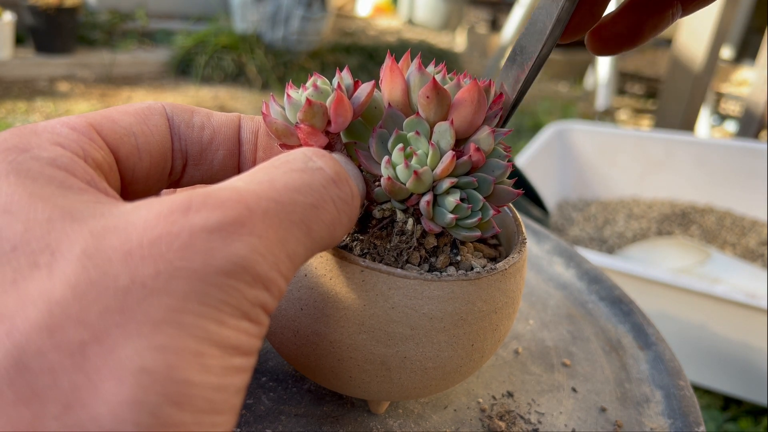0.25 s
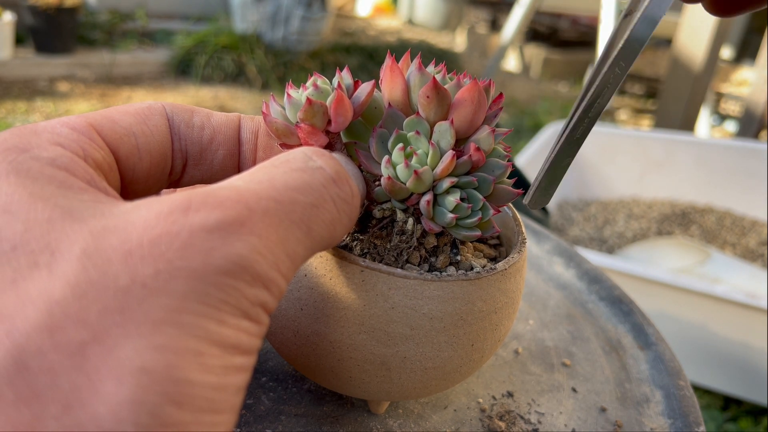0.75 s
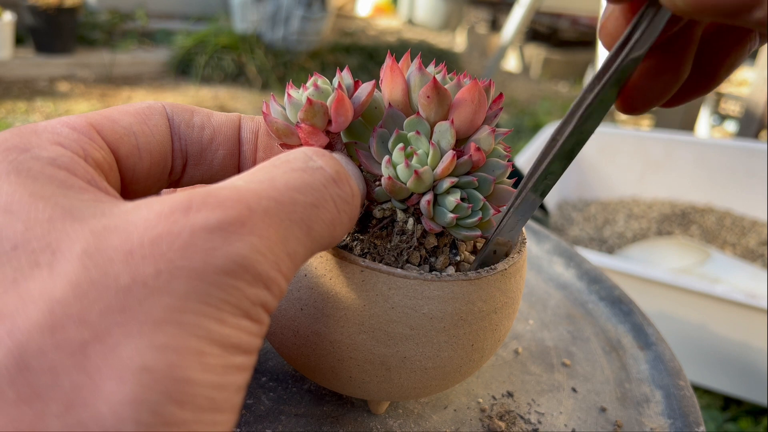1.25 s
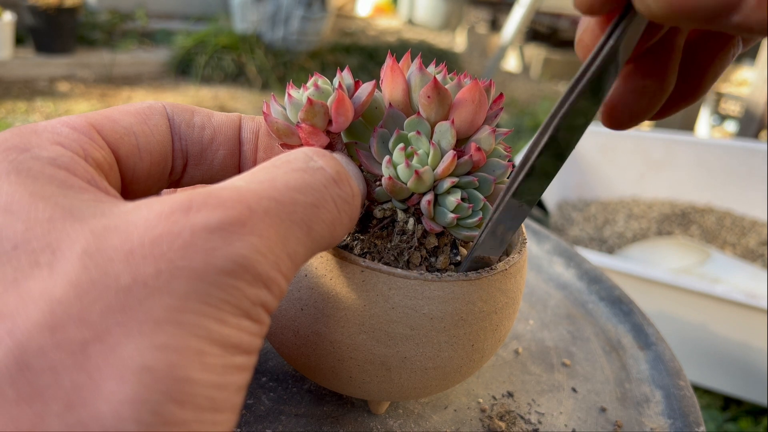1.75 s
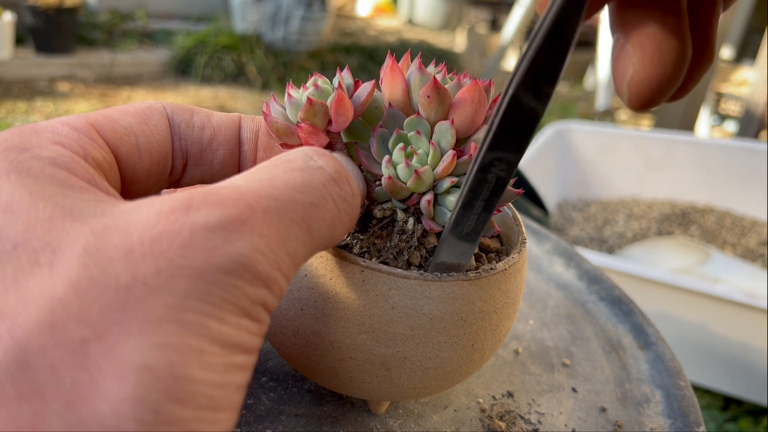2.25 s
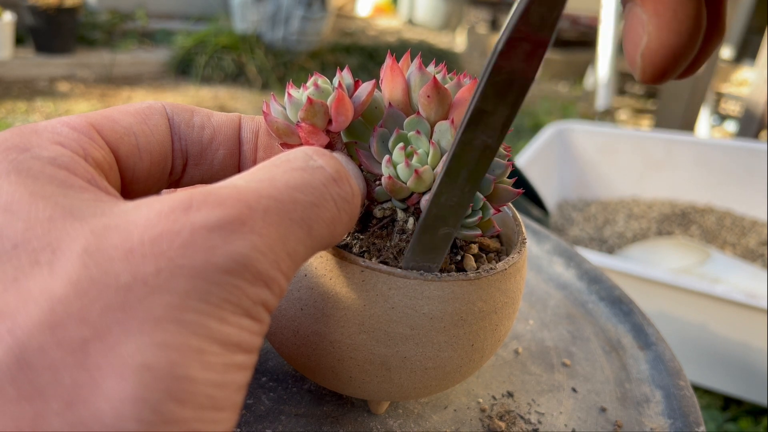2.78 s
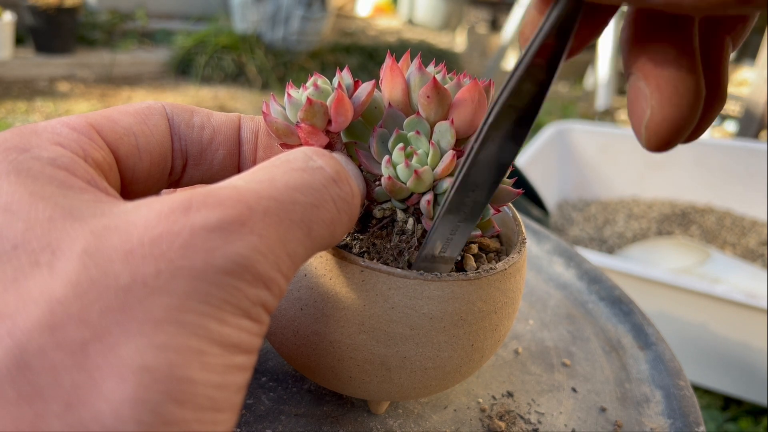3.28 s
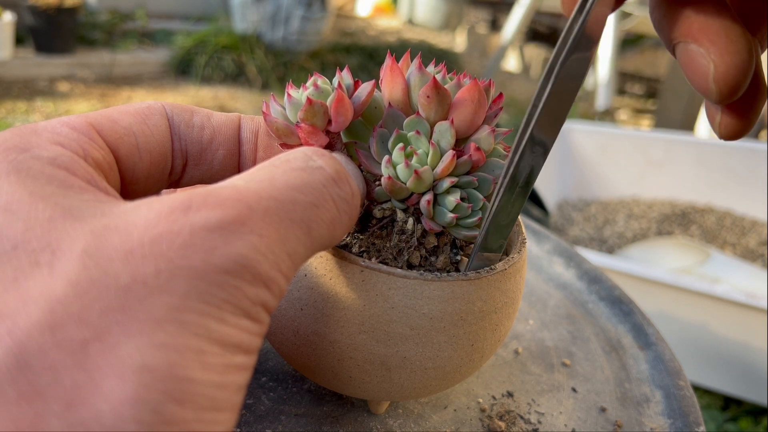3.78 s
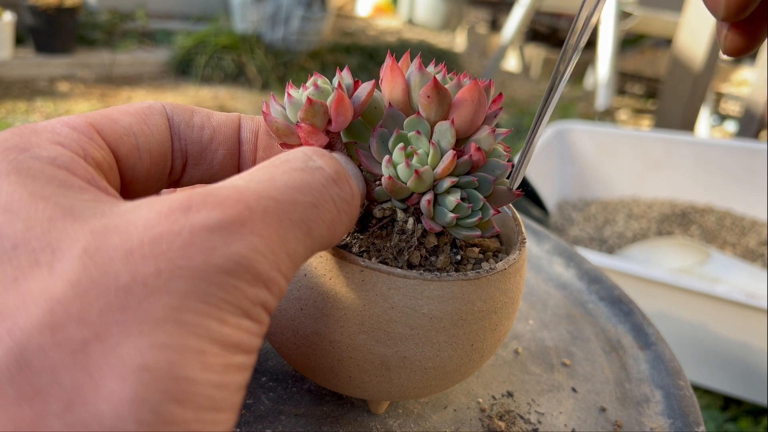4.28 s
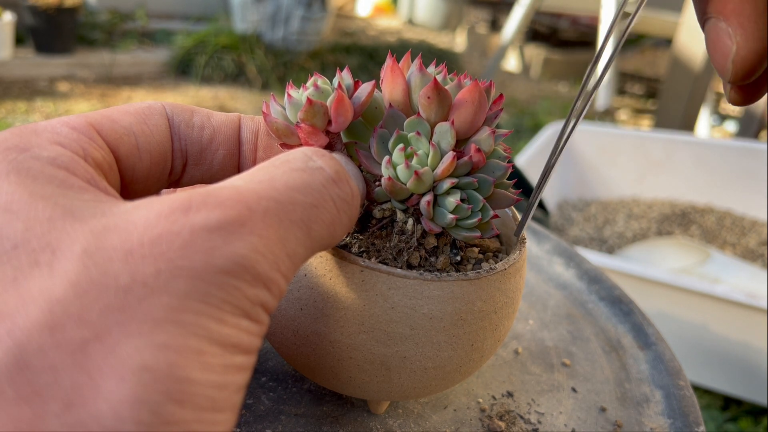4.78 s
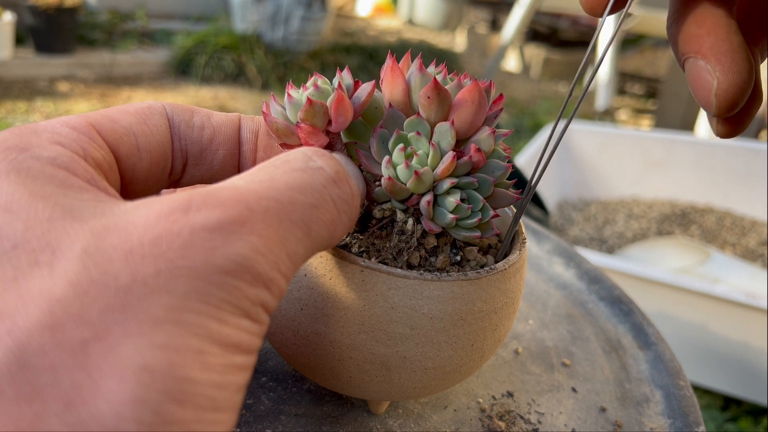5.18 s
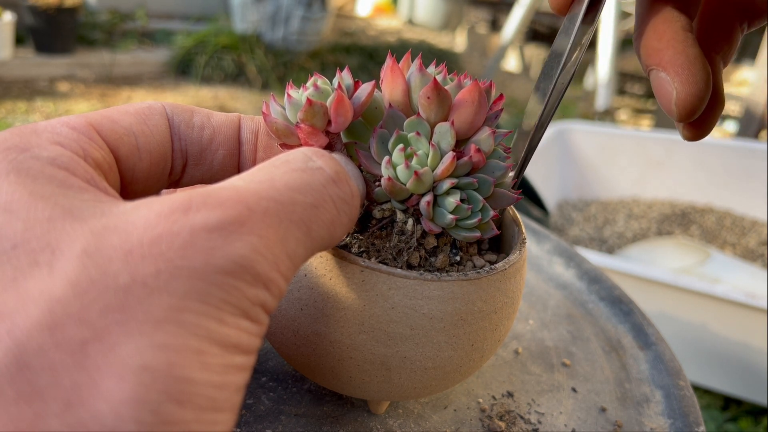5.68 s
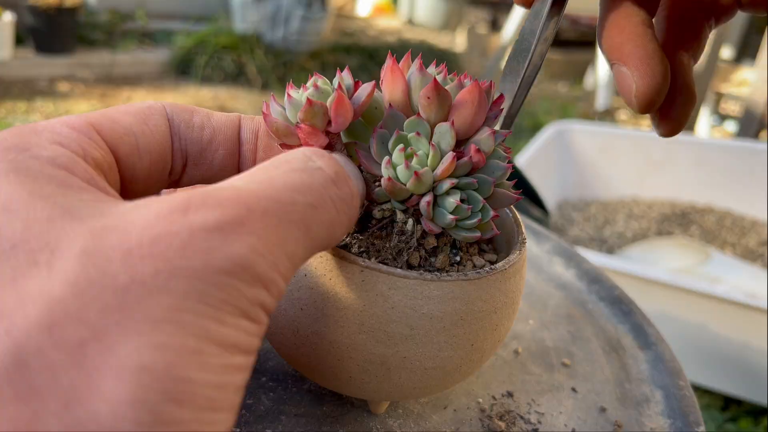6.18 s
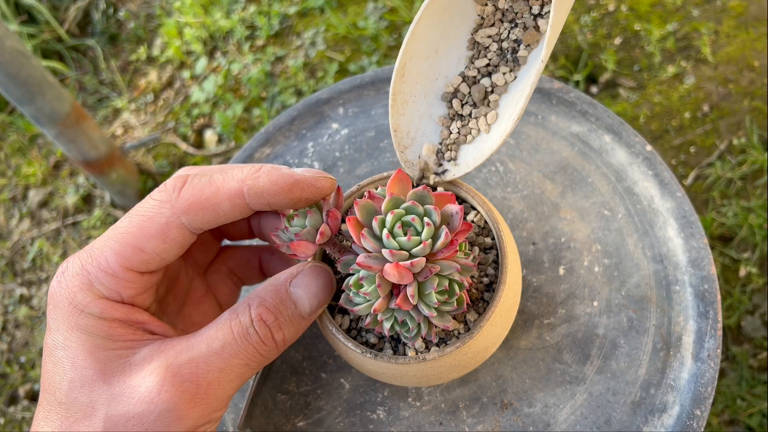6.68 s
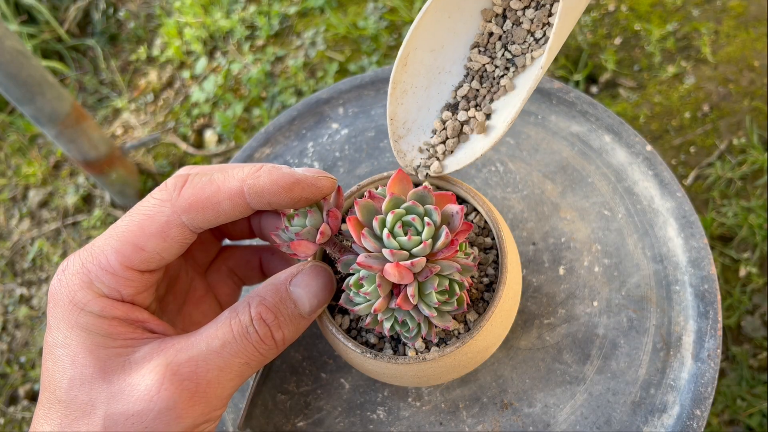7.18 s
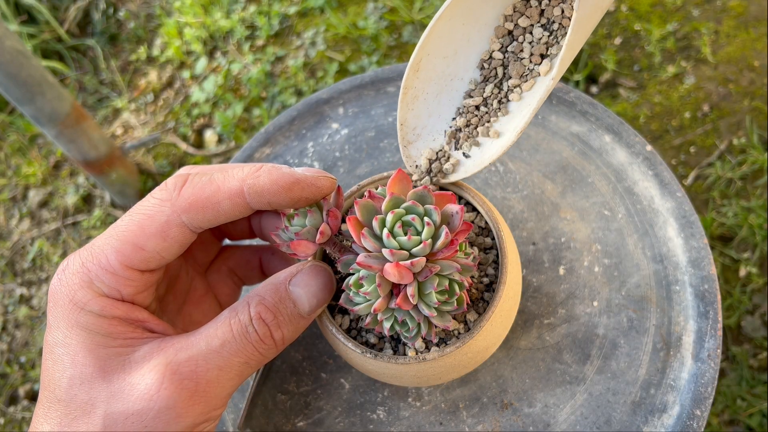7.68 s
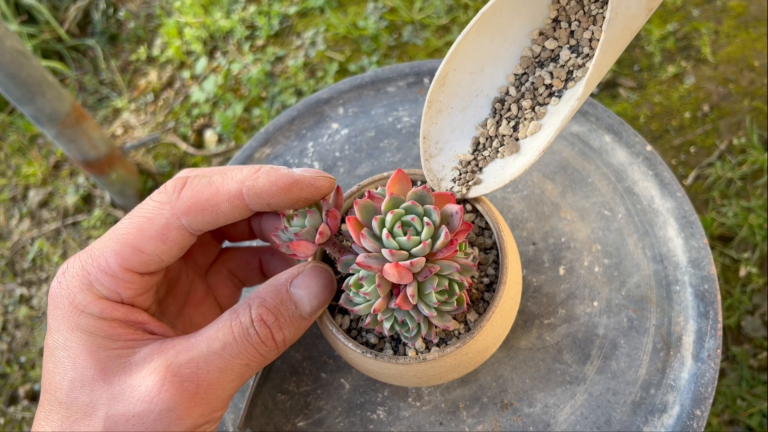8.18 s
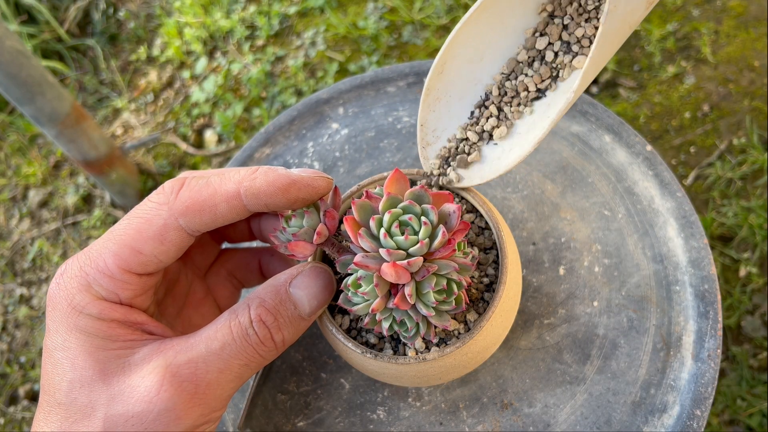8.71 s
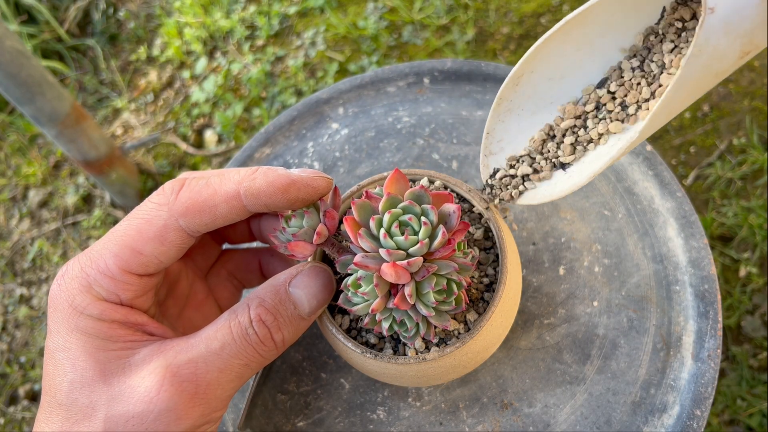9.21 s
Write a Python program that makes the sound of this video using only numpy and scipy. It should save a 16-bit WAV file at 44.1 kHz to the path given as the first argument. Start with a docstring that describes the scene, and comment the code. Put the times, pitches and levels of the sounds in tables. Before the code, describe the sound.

Close metallic pokes and stone clicks pack a potted succulent, followed by hissing, ticking gravel and finger taps over a faint engine hum.

```python
"""Outdoors, far engines rumble and hum throughout, made from shaped noise and wavering tones.
Steel tweezers poke gritty soil into a small ceramic pot: random grain contacts ring the steel and crunch.
The tips click on stones, the pot rocks on its tray with a clack and a ring, and quick jabs pack the soil.
Then fine gravel, a hiss full of tiny ticks, slides from a plastic scoop that is tapped with a finger.
The level dips briefly during the pouring; near the end a few stones ring the metal tray."""
import sys
import numpy as np
from scipy import signal
from scipy.fft import rfft, irfft, next_fast_len
from scipy.io import wavfile
from scipy.ndimage import map_coordinates

SR = 44100
rng = np.random.default_rng(int(sys.argv[2]) if len(sys.argv) > 2 else 0)


def inscribe(sig):
    """Save sig as 16-bit PCM at rate SR to the path in sys.argv[1].

    A 1-D sig is mono; a 2-D sig holds one channel per row.
    Samples are clipped to [-1, 1] before scaling.
    """
    pcm = np.round(np.clip(np.atleast_2d(sig).T, -1, 1) * 32767)
    wavfile.write(sys.argv[1], SR, pcm.astype(np.int16))


N = 416744

# Far engines. Each row: time in seconds, level in dB before the overall trim in outdoors().
LOW_HUM_LEVEL = [(0, -48), (.55, -59.5), (1.7, -49.5), (3.0, -50.5), (4.45, -54.5), (5.5, -76.5),
                 (6.7, -59.5), (8.0, -59), (9.45, -55)]
HIGH_HUM_LEVEL = [(0, -62), (1.5, -56.5), (3.1, -53), (4.45, -54), (5.4, -44.5), (6.1, -57), (7.3, -63),
                  (8.0, -53.5), (9.2, -52.5), (9.45, -67)]
RUMBLE_LEVEL = [(0, -60.5), (.9, -64.5), (1.8, -59.5), (3.5, -60), (4.45, -64), (5.2, -60), (6.2, -62.5),
                (9.45, -65.5)]
# Tone colour of the rumble. Each row: frequency in Hz, relative level in dB.
RUMBLE_SPECTRUM = [(20, -15.5), (35, -11), (55, 2), (85, -4), (120, -4), (170, -9), (250, -14.5),
                   (400, -21.5), (800, -29.5), (1500, -37.5), (2500, -47), (7000, -47), (10000, -62),
                   (16000, -56.5)]
# How alike the rumble is left and right. Each row: frequency in Hz, likeness (1 = the same, 0 = unrelated).
RUMBLE_LIKENESS = [(60, 0.96), (130, 0.91), (300, 0.66), (700, 0), (8000, 0.11)]
# A faint whine swells and fades. Each row: middle in seconds, level in dB, half length in seconds.
WHINE_SWELLS = [(0.558, -79, 0.056), (4.914, -61.5, 0.18)]
# Tone colour of the whine, then of the low drone. Each row: frequency in Hz, relative level in dB.
WHINE_SPECTRUM = [(1100, -31.5), (1420, -12.5), (1520, 1.5), (1630, -17.5), (2000, -54.5)]
DRONE_SPECTRUM = [(55, -42), (72, 5), (82, 10), (92, 5), (120, -48)]
# An uneven, wind-like low drone comes and goes once: middle in seconds, level in dB, half length in seconds.
DRONE_S, DRONE_DB, DRONE_HALF_S = 6.61, -56.5, 0.53

# The steady trickle, set by the scoop's tilt. Each row: time in seconds, level in dB before gravel()'s trim.
TRICKLE_LEVEL = [(6.28, -68), (6.38, -66.5), (6.65, -67.5), (7.1, -67), (7.85, -66.5), (8.25, -79),
                 (8.6, -73), (8.85, -66.5), (9.45, -65.5)]
# The heap gives way at once. Each row: middle in seconds, level in dB before the same trim,
# half length in seconds.
SLUMPS = [(6.866, -61, .08), (9.131, -55, 0.062)]
# Each slide gathers speed and runs out.
SLIDE_RISE_S, SLIDE_FALL_S = 0.01, 0.04
# Tone colour of sliding gravel. Each row: frequency in Hz, relative level in dB.
GRAVEL_SPECTRUM = [(300, -8.5), (600, -10), (1000, -1), (1500, -2.5), (2200, -9), (2700, -12.5),
                   (3000, -7.5), (3400, -11.5), (4000, -11), (6000, -12.5), (9000, -18), (10300, -29),
                   (12000, -18.5), (16000, -37)]
# The biggest stones land in the pot. Each row: start in seconds, level in dB, strongest frequency in Hz.
BIG_STONES = [(6.3898, -42, 3100), (6.915, -38.5, 4590), (7.1556, -41, 11400), (7.2417, -38, 4970),
              (7.2803, -45.5, 6800), (9.2612, -45, 4120)]
# Smaller ones fall at random, more strongly in a fuller trickle: dB over the trickle's row,
# spread in dB, middle of the pitches in Hz, their spread in octaves.
PEBBLE_COUNT = 30
PEBBLE_DB, PEBBLE_SPREAD_DB, PEBBLE_HZ, PEBBLE_OCTAVES = 16.5, 1.5, 4700, 0.19
# Stones spill onto the tray. Each row: start in seconds, level in dB.
TRAY_SPILLS = [(9.3078, -39), (9.317, -42.5), (9.3394, -48), (9.363, -46), (9.382, -44), (9.3886, -40.5)]
# The tray's resonances. Each row: frequency in Hz, width in Hz, level in dB.
TRAY_MODES = [(2276, 23, -3), (3300, 85, -8), (4370, 58, -6), (4820, 60, -2), (5590, 34, -5),
              (6120, 100, -2), (7650, 31, -7), (8980, 59, -7), (10800, 56, -12), (11460, 70, -5),
              (12760, 56, -13), (15250, 67, -5)]

# Taps on the scoop. Each row: start in seconds, thump level in dB, rattle in dB relative to the thump
# (before the trims in taps()), level in dB of the slide it sets off (before gravel()'s trim).
SCOOP_TAPS = [(6.716, -39.5, -5.5, -64), (6.964, -49.5, -8, -64), (7.229, -42, -4.5, -58.5),
              (7.378, -39.5, 0.5, -65), (7.627, -49.5, 2, -66), (7.73, -38.5, -3.5, -66),
              (7.875, -41, -0.5, -63), (8.031, -43, -4.5, -68.5), (8.149, -49, -4, -64.5),
              (8.251, -48, -35, -89), (8.303, -39.5, -0.5, -60), (8.456, -41.5, -4.5, -77),
              (8.615, -37.5, 3.5, -77), (8.74, -37, -4, -60), (8.902, -35, 2, -61.5),
              (9.057, -37, -3, -61.5)]
# The plastic scoop's resonances. Each row: frequency in Hz, width in Hz, level in dB.
SCOOP_MODES = [(242.5, 59, 5), (312, 118, 2), (545, 124, -9), (985, 36, -7.5), (1310, 47, -15),
               (3137, 20, -14)]
# Tone colours of the thump and of the rattling load. Each row: frequency in Hz, relative level in dB.
THUMP_SPECTRUM = [(80, -4.0), (220, 1.5), (600, -2), (2000, -8.5)]
RATTLE_SPECTRUM = [(300, 0), (500, 1), (650, -7), (800, 0), (1450, 2.5), (2150, -11), (3000, -10.5),
                   (3400, -10.5), (4500, -10), (7000, -20), (12000, -30), (16000, -28)]
# A harder rattle is brighter: treble dB per dB over a firm tap.
FIRM_TAP_DB, TAP_BRIGHTENS = -39, 0.29

# The pot knocks on the tray. Each row: start in seconds, level in dB, hardness as treble change in dB.
POT_KNOCKS = [(4.075, -22, -15), (4.811, -17.5, 9.5), (4.878, -22, -5)]
# The pot's ring. Each row: frequency in Hz, level in dB, time in seconds to die away by 60 dB.
POT_MODES = [(731, -1.5, 0.018), (967, -11, 0.11), (1472, 0.5, 0.028), (1600, -11.5, 0.11),
             (2190, -21, 0.088), (2430, -11, 0.04), (3160, -12, 0.0095), (4730, -26.5, 0.028),
             (8700, -26, 0.021)]
# Tone colour of the pot's thud. Each row: frequency in Hz, relative level in dB.
THUD_SPECTRUM = [(200, -39.5), (420, -38), (680, -3), (1300, 2), (2000, -10.5), (3000, -14.5), (3900, -27),
                 (4900, -18.5), (6200, -42.5), (9000, -45), (16000, -37)]
# The pot heard in stereo. Each row: frequency in Hz, left minus right in dB.
POT_BALANCE = [(60, 3.5), (92, -6), (140, -23.5), (210, -6.5), (330, -2.5), (500, 10), (770, 0.5),
               (1170, 11), (1790, 0), (2740, -2.5), (4190, 5.5), (6410, 1), (9810, 2.5), (15000, 1)]
# Its phase. Each row: frequency in Hz, radians by which the left side leads.
POT_PHASE = [(200, -0.5), (800, 1.23), (1100, 3), (1330, 1), (1600, 2.5), (2000, 1.22), (2400, 3.5),
             (3000, 4), (5000, 1.74), (7500, 1.5), (8700, -0.5), (11500, -6), (12800, -7.5), (16000, -12)]

# The tips snap against a stone. Each row: start in seconds, level in dB, soil crunch in dB relative to it,
# treble change in dB (crunch and treble before the trims in clicks()).
STONE_CLICKS = [(1.151, -38, -10, -17), (1.4353, -17, -24, -5), (2.0218, -14.5, -20.5, -17),
                (2.443, -23.5, -14, -23.5), (2.6737, -19.5, -16, -28), (3.4463, -18.5, -29, -13),
                (3.565, -32.5, -3, -49), (3.9636, -21.5, -14.5, -20), (4.0743, -47.5, -21, 17),
                (4.3073, -46.5, -30, 9), (4.902, -34, -4, -33), (5.037, -27, -16.5, -9.5),
                (5.1979, -15.5, -23, -7), (5.3645, -18, -16, -21), (6.1916, -22, -12, -29)]
# Tone colour of the snap. Each row: frequency in Hz, relative level in dB.
SNAP_SPECTRUM = [(600, -25), (2700, 0), (7000, -8), (16000, -12)]
# Resonances of the tweezers. Each row: frequency in Hz, width in Hz, level in dB.
STEEL_MODES = [(1979, 119, 2.5), (2370, 440, -7), (4940, 238, -1.5), (5140, 1100, -19.5), (8713, 140, -6),
               (11850, 430, -20.5), (13080, 400, -13), (15130, 230, -12.5)]
# The fingers' grip damps or frees the steel's upper modes. Each row: time in seconds, then dB for
# the broad mode beside the first, for the second bending mode and for the treble.
GRIP_CHANGES = [(0.2, 0, 1.5, -0.5), (1.5, 1.5, 5, -1), (2.25, -5, 0, -7), (2.7, -4.5, -3, -7.5),
                (3.5, -3.5, 1, -5.5), (3.85, 3, 5, -1), (5.15, -1.5, -0.5, -3), (5.42, -6, 2, -13.5),
                (6.2, -4.5, -6, -12)]
# Where the tips work. Each row: time in seconds, left minus right in dB, added to the pot's own balance.
TIP_PLACE = [(0.0, -4), (0.42, -3.5), (0.43, 1.5), (0.94, 2), (1.64, -3.5), (3.17, 2), (3.67, -2),
             (4.05, 1.5), (6.25, -1.5)]

# Single pokes into the grit. Each row: start in seconds, length in seconds, steel level in dB,
# soil level in dB (both levels before the trims in scraping()).
SINGLE_POKES = [(0.025, 0.054, -41, -54), (0.105, 0.07, -46, -54.5), (0.215, 0.037, -44.5, -57),
                (0.295, 0.036, -42, -50.5), (0.365, 0.031, -43, -52.5), (1.152, 0.081, -58.5, -55.5),
                (1.228, 0.075, -63.5, -55), (1.35, 0.077, -62, -73), (1.45, 0.057, -50, -63),
                (1.495, 0.04, -44, -43), (1.575, 0.061, -45.5, -54.5), (1.695, .075, -42.5, -50.5),
                (1.805, 0.064, -39.5, -57), (1.905, 0.051, -40, -50.5), (2.03, 0.059, -42, -55),
                (2.125, 0.066, -40.5, -45), (2.22, 0.046, -45, -54), (2.348, 0.044, -45, -51),
                (2.45, 0.11, -51.5, -60), (2.578, .048, -47, -49), (2.68, 0.041, -41.5, -51),
                (2.865, 0.045, -67.5, -63), (3.075, 0.055, -65.5, -58), (3.222, 0.047, -53.5, -67),
                (3.28, 0.062, -65, -57), (3.472, 0.051, -42, -43), (3.565, 0.1, -48, -52.5),
                (3.672, 0.06, -42, -48.5), (3.765, 0.074, -49, -57), (3.87, 0.062, -46, -50.5),
                (3.975, 0.059, -49.5, -60), (5.045, 0.065, -49.5, -53), (5.148, 0.03, -63.5, -65),
                (5.215, 0.12, -48.5, -53), (5.372, 0.026, -46, -52)]
# Tone colour of the crunching soil. Each row: frequency in Hz, relative level in dB.
SOIL_SPECTRUM = [(250, -41), (480, -16), (700, -5.5), (950, -2.5), (1120, 0), (1350, -5), (1520, 1),
                 (1720, -17.5), (2400, -5), (2700, -15), (3000, -16.5), (3500, -21.5), (7000, -27.5),
                 (16000, -39.5)]
# Every poke bites, is pressed hardest in its middle and lets go.
ATTACK_S, RELEASE_S, ARCH_DB = 0.0036, 0.0084, 4.5
BRUSH_DB = -14.5  # the tips brush loose grit on the way in and out
# A lighter touch sounds brighter: treble dB per dB below a firm push.
FIRM_DB, LIGHT_BRIGHTENS = -45, .2
# The soil is packed with a run of quickening jabs: first start, first gap, how much each gap shrinks.
JAB_COUNT = 12
JAB_START_S, JAB_GAP_S, JAB_QUICKENS_S = 5.421, .0757, .00176
JAB_DUTY, JAB_SOIL_DB = 0.59, -6.5  # share of each gap; soil relative to steel before the trims
# Effort of the jabs. Each row: time in seconds, steel level in dB before the trim in scraping().
JAB_STEEL_LEVEL = [(5.44, -43), (5.53, -43), (5.67, -47.5), (5.8, -39.5), (5.87, -41.5), (5.995, -55),
                   (6.06, -39.5), (6.18, -47.5)]

# The level of everything dips briefly during the pouring.
DIP_S, DIP_DB, DIP_HALF_S = 8.7, -10, 0.01
TOP_HZ = 16300  # upper edge of the sound


def amp(db):
    """Turn decibels into a gain."""
    return 10 ** (np.asarray(db) / 20)


def unit(x):
    """Scale to an average strength (rms) of 1."""
    return x / np.sqrt(np.mean(x ** 2) + 1e-20)


def crest(x):
    """Scale to a peak of 1."""
    return x / (np.abs(x).max() + 1e-20)


def clock(size=N):
    """Sample times in seconds."""
    return np.arange(size) / SR


def along(points, hz):
    """Read (frequency, value) points between their rows, on a log frequency axis."""
    f, v = np.transpose(points)
    return np.interp(np.log(hz + 1), np.log(f), v)


def curves(rows):
    """One value per sample for each column after the time."""
    s, *cols = np.transpose(rows)
    return [np.interp(clock(), s, c) for c in cols]


def wobble(rate):
    """A smooth random curve with the given number of random points a second."""
    knots = rng.standard_normal(int(N * rate / SR) + 4)
    return map_coordinates(knots, [clock() * rate])


def swell(s, half):
    """A bell-shaped rise and fall around time s."""
    return np.exp(-((clock() - s) / half) ** 2)


def filtered(x, response):
    """Multiply the sound's spectrum by a response that depends on frequency."""
    n = x.shape[-1]
    m = 2 * next_fast_len(n // 2 + 4096)  # spare room for the filter's tail
    return irfft(rfft(x, m) * response(np.fft.rfftfreq(m, 1 / SR)), m)[..., :n]


def coloured(x, spectrum):
    """Give a sound a tone colour with a filter that never acts ahead of its input."""
    def response(hz):
        # folding the cepstrum gives the phase that belongs to these levels
        cepstrum = irfft(np.log(amp(along(spectrum, hz))))
        cepstrum[1:len(hz) - 1] *= 2
        cepstrum[len(hz):] = 0
        return np.exp(rfft(cepstrum))
    return filtered(x, response)


def rung(x, modes):
    """Let a sound excite a body's resonances, each of which rings at its own pitch."""
    def response(hz):
        total = 0
        for k, (centre, width, db) in enumerate(modes):
            band = 1j * hz * width / (centre * centre - hz * hz + 1j * hz * width)
            total = total + (-1) ** k * amp(db) * band  # neighbours have opposite sign
        return total
    return filtered(x, response)


def treble(x, db):
    """Harder contacts drive the upper modes more: raise or lower the treble."""
    return filtered(x, lambda hz: amp(along([(2500, 0.024), (10000, 1.0)], hz) * db))


def grains(rate, spread_db, size=N):
    """Tiny contacts of random size, about rate of them a second, with rms 1."""
    hit = rng.random(size) < rate / SR
    sign = rng.choice([-1, 1], size)
    force = amp(spread_db * np.clip(rng.standard_normal(size), -2, 2))
    return unit(hit * sign * force)


def pings(rate, spread_db, low_hz, high_hz, t60, size):
    """Stones of every size tick, each briefly at its own pitch; rms 1."""
    count = int(rate * size / SR) + 1
    when, pitch, force, phase = rng.random((count, 4)).T[:, :, None]
    t = clock(256)
    hz = low_hz + pitch * (high_hz - low_hz)
    fade = amp(-spread_db * np.log(force + 0.023) - 60 * t / t60)
    ticks = fade * np.sin(2 * np.pi * (hz * t + phase))
    places = (when * size).astype(int) + np.arange(len(t))
    return unit(np.bincount(places.ravel(), ticks.ravel(), size)[:size])


def burst(t60, tail_db, tail_t60, size=8192):
    """A contact in fading noise: a brief crack and a longer chatter."""
    t = clock(size)
    return rng.standard_normal(size) * (amp(-60 * t / t60) + amp(tail_db - 60 * t / tail_t60))


def add(track, s, sound):
    """Mix a sound into a track at time s."""
    room = track[..., max(round(s * SR), 0):][..., :sound.shape[-1]]
    room += sound[..., :room.shape[-1]]


def hum(hz):
    """A tone whose pitch and strength waver at random."""
    tone = np.sin(2 * np.pi * np.cumsum(hz + 0.7 * wobble(5)) / SR)
    return unit(tone * amp(0.54 * wobble(6)))


def outdoors(rumble_db=8, low_db=-2, high_db=-1.0, low_hz=68, high_hz=99.3):
    """Far engines' uneven rumble and two wavering hums; also a low, wind-like drone and a faint whine."""
    low, high, rumble = curves(LOW_HUM_LEVEL) + curves(HIGH_HUM_LEVEL) + curves(RUMBLE_LEVEL)

    def spread(hz):
        # the less alike the two sides are, the more goes to their difference
        turn = np.arccos(np.clip(along(RUMBLE_LIKENESS, hz), -1, 1)) / 2
        return amp(along(RUMBLE_SPECTRUM, hz)) * [np.cos(turn), np.sin(turn)]

    mid, side = filtered(rng.standard_normal((2, N)), spread)
    air = unit(np.array([mid + side, mid - side])) * amp(rumble + rumble_db + wobble(9.5))
    whine = unit(coloured(rng.standard_normal((2, N)), WHINE_SPECTRUM))
    whine_level = sum(amp(db) * swell(s, half) for s, db, half in WHINE_SWELLS)
    drone = unit(coloured(rng.standard_normal(N), DRONE_SPECTRUM))
    drone_level = amp(DRONE_DB) * swell(DRONE_S, DRONE_HALF_S)
    hums = amp(low + low_db) * hum(low_hz) + amp(high + high_db) * hum(high_hz)
    return air + drone_level * drone + hums + whine_level * whine


def trickle(size):
    """Fine sand hisses while coarser grit ticks through it."""
    sand = grains(rate=9000, spread_db=4.5, size=size)
    grit = pings(rate=1500, spread_db=5, low_hz=900, high_hz=9000, t60=.008, size=size)
    return sand + .65 * grit


def flow():
    """How much gravel moves: a steady trickle, a slide after each tap and slumps; their powers add."""
    power = amp(curves(TRICKLE_LEVEL)[0]) ** 2
    t = clock(SR // 2)
    slide = crest((1 - np.exp(-t / SLIDE_RISE_S)) * np.exp(-t / SLIDE_FALL_S))
    for s, _, _, db in SCOOP_TAPS:
        add(power, s, (amp(db) * slide) ** 2)
    slumps = sum((amp(db) * swell(s, half)) ** 2 for s, db, half in SLUMPS)
    return np.sqrt(power + slumps)


def pebbles(start):
    """Small stones that drop at random from start on: rows like those of the big stones."""
    when = rng.uniform(start, N / SR, PEBBLE_COUNT)
    force, pitch = np.clip(rng.standard_normal((PEBBLE_COUNT, 2)).T, -2, 2)
    db = np.interp(when, *np.transpose(TRICKLE_LEVEL)) + PEBBLE_DB + PEBBLE_SPREAD_DB * force
    return list(zip(when, db, PEBBLE_HZ * 2 ** (PEBBLE_OCTAVES * pitch)))


def gravel(level_db=2, stone_db=0, spill_db=0):
    """Gravel slides in surges; single stones tick into the pot or ring the tray."""
    out, start = np.zeros((2, N)), 6.26
    size = N - round(start * SR)
    add(out, start, unit(coloured(np.array([trickle(size), trickle(size)]), GRAVEL_SPECTRUM)))
    out *= flow() * amp(level_db + 2.6 * wobble(60))
    for s, db, hz in list(BIG_STONES) + pebbles(start):
        tick = np.array([burst(t60=0.011, tail_db=-18, tail_t60=0.075) for _ in range(2)])
        tick = coloured(tick, [(hz / 5, -18), (hz / 2, -8), (hz, 0), (2 * hz, -8)])
        add(out, s, amp(db + stone_db) * crest(tick))
    for s, db in TRAY_SPILLS:
        tick = np.array([burst(t60=0.02, tail_db=-11, tail_t60=0.13) for _ in range(2)])
        spill = treble(crest(rung(tick, TRAY_MODES)) + 0.52 * crest(tick), 0.5)
        add(out, s, amp(db + spill_db) * crest(spill))
    return out * amp([[.9], [-.9]])  # a little to the left


def taps(thump_db=0, rattle_db=3, crack_db=8.0, lag=0.00205):
    """A finger taps the scoop: the load of gravel cracks against it and resettles, the plastic thumps."""
    out = np.zeros((2, N))
    for s, db, jump_db, _ in SCOOP_TAPS:
        blow = amp(-32.5) * burst(t60=0.036, tail_db=-5, tail_t60=0.22)
        blow[0] += 1
        thump = crest(coloured(rung(blow, SCOOP_MODES), THUMP_SPECTRUM))
        crack = np.array([burst(t60=.007, tail_db=-40, tail_t60=.02) for _ in range(2)])
        crack = crack + crack[::-1] * 0.082  # a little of each side reaches the other
        rattle = np.array([burst(t60=0.027, tail_db=-1, tail_t60=0.093) for _ in range(2)])
        jump = amp(crack_db) * crest(coloured(crack, RATTLE_SPECTRUM))
        jump = jump + amp(rattle_db) * crest(coloured(rattle, RATTLE_SPECTRUM))
        bright_db = 0.5 + TAP_BRIGHTENS * (db + jump_db - FIRM_TAP_DB)
        add(out, s + lag, amp(db + thump_db) * thump * amp([[2.5], [-2.5]]))
        add(out, s, amp(db + jump_db) * treble(jump, bright_db))
    return out


def knocks(thud_db=-1, ring_db=-1):
    """The pot tips and comes down on its feet: a dull clack and the ring of the clay."""
    out, t = np.zeros(N), clock(8192)
    for s, db, hard_db in POT_KNOCKS:
        thud = crest(coloured(burst(t60=.014, tail_db=-24, tail_t60=.1), THUD_SPECTRUM))
        ring = np.zeros(len(t))
        for hz, level, t60 in POT_MODES:
            ring += amp(level - 60 * t / t60) * np.sin(2 * np.pi * (hz * t + rng.random()))
        ring = crest(ring * (1 - np.exp(-t / 0.00034)))  # a soft start
        # a softer landing drives the upper modes less
        hardness = [(1000, 0), (1500, hard_db / 2), (3500, hard_db)]
        landing = coloured(amp(thud_db) * thud + amp(ring_db) * ring, hardness)
        add(out, s, amp(db) * landing)
    return out


def grip(s):
    """What the grip adds at time s, in dB: to the broad mode, the second bending mode and the treble."""
    when, *columns = np.transpose(GRIP_CHANGES)
    return [np.interp(s, when, column) for column in columns]


def gripped(s, shift, scatter_db):
    """The steel's modes: the grip table sets levels at time s; pitch and level also vary at random."""
    hz, width, db = np.transpose(STEEL_MODES)
    broad_db, second_db, _ = grip(s)
    grip_db = np.array([0, broad_db, second_db, second_db, 0, 0, 0, 0])
    detune, level = rng.standard_normal((2, len(hz)))
    shifted_hz = hz * (1 + shift * detune * np.sqrt(hz[0] / hz))
    return np.transpose([shifted_hz, width, db + grip_db + scatter_db * level])


def clicks(level_db=0, treble_db=13, soil_db=2):
    """A tip slips off a stone and chatters on the next: the steel's bending modes ring briefly."""
    out = np.zeros(N)
    for s, db, crunch_db, bright_db in STONE_CLICKS:
        blow = amp(-22) * burst(t60=.022, tail_db=-22, tail_t60=.06)
        blow[0] += 1
        steel = rung(blow, gripped(s, shift=0, scatter_db=-0.5))
        ring = crest(treble(steel, bright_db + treble_db))
        crunch = crest(coloured(burst(t60=0.015, tail_db=-13.5, tail_t60=.04), SOIL_SPECTRUM))
        snap = crest(coloured(burst(t60=.012, tail_db=-32, tail_t60=.04), SNAP_SPECTRUM))
        add(out, s, amp(db + level_db) * (ring + amp(crunch_db + soil_db) * crunch))
        add(out, s, amp(db - 12) * snap)
    return out


def jabs():
    """The packing jabs as pokes: each gap and each jab is a little shorter than the last."""
    gaps = JAB_GAP_S - JAB_QUICKENS_S * np.arange(JAB_COUNT)
    starts = JAB_START_S + np.cumsum(gaps) - gaps
    lengths = JAB_DUTY * gaps
    db = np.interp(starts + lengths / 2, *np.transpose(JAB_STEEL_LEVEL))
    return list(zip(starts, lengths, db, db + JAB_SOIL_DB))


def pressure(t, length):
    """The force of one poke: attack, an arched hold, release."""
    attack = (1 + np.tanh(t / ATTACK_S / 2)) / 2
    release = (1 + np.tanh((length - t) / RELEASE_S / 2)) / 2
    off_middle = (2 * t / length - 1) ** 2
    brush = amp(BRUSH_DB) * np.exp(-off_middle / 2)
    return (attack * release + brush) * amp(-ARCH_DB * np.minimum(off_middle, 1))


def sinking(crunch, depth, fall_db):
    """The crunch is bright as the tips go in and dull when they sit deep."""
    dull = filtered(crunch, lambda hz: 1 / (1 + (hz / 1200) ** 4))
    return dull * amp(fall_db * depth) + (crunch - dull) * amp(-fall_db * depth)


def scraping(steel_db=1, soil_db=1, catch_db=2.5, lag=0.0014):
    """Each poke drags the tips past grains, which ring the steel; the soil gives way a moment later."""
    out = np.zeros(N)
    t = clock(12288) - .07  # starts ahead of the poke to leave room for the brushing
    catches = amp(catch_db * wobble(120))  # the tips catch and slip
    for s, length, db, crunch_db in list(SINGLE_POKES) + jabs():
        push = pressure(t, length) * unit(catches[max(round(s * SR), 0):][:len(t)])
        modes = gripped(s, shift=.022, scatter_db=1.5)
        treble_db = grip(s)[-1] + LIGHT_BRIGHTENS * (FIRM_DB - db)
        contacts = grains(rate=2600, spread_db=5.5, size=len(t))
        steel = unit(treble(rung(contacts, modes), treble_db))
        crumbs = pings(rate=700, spread_db=4.5, low_hz=500, high_hz=2900, t60=.014, size=len(t))
        crumbling = 0.43 * crumbs + grains(rate=4000, spread_db=5.5, size=len(t))
        soil = unit(coloured(crumbling, SOIL_SPECTRUM))
        soil = sinking(soil, np.tanh(2 * t / length - 1), fall_db=9.0)
        soil = soil * np.interp(t - lag, t, push)
        poke = amp(steel_db + db) * push * steel + amp(soil_db + crunch_db) * soil
        begin = s + t[0]
        add(out, begin, poke[max(-round(begin * SR), 0):])  # cut what lies ahead of time zero
    return out


def scattered(x, count=40):
    """Brief diffuse echoes: overlapping pieces of the sound each get a fresh random tail."""
    out, hop = np.zeros((2, N)), N // count + 1
    padded = np.pad(x, ((0, 0), (hop, 2 * hop)))
    for k in range(count):
        echoes = rng.standard_normal((2, 4096)) * amp(-60 * clock(4096) / .05)
        piece = padded[:, k * hop:][:, :2 * hop] * np.hanning(2 * hop)  # pieces overlap by half
        tail = signal.fftconvolve(piece, echoes / np.linalg.norm(echoes[0]), axes=1)
        add(out, max(k - 1, 0) * hop / SR, tail[:, hop * (k == 0):])
    return out


def scene():
    """The pot stands close, so each side hears its own level and phase; brief echoes blur it a little."""
    def half(hz):
        return amp(along(POT_BALANCE, hz) / 2) * np.exp(.5j * along(POT_PHASE, hz))

    place_db, = curves(TIP_PLACE)
    place = amp(np.array([place_db, -place_db]) / 2)
    work = (scraping() + clicks()) * place + knocks()
    pot = filtered(work, lambda hz: np.array([half(hz), 1 / half(hz)]))
    dip = amp(DIP_DB * swell(DIP_S, DIP_HALF_S))
    return (pot + amp(-9) * scattered(pot) + taps() + gravel() + outdoors()) * dip


def record(dry):
    """A steep low-pass filter removes nearly everything above the top frequency."""
    return filtered(dry, lambda hz: 1 / (1 + (hz / TOP_HZ) ** 120))


dry = scene()
out = record(dry)
inscribe(out)
```